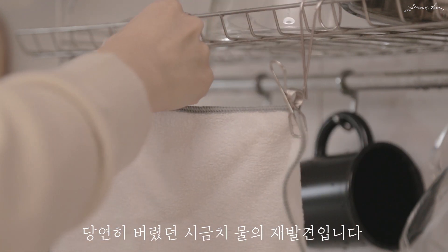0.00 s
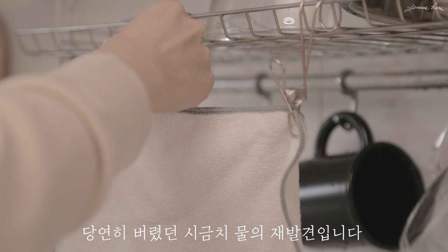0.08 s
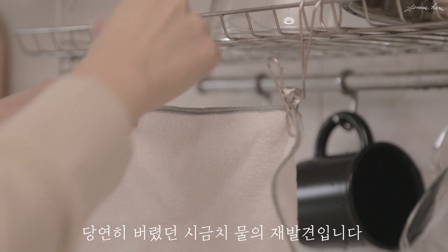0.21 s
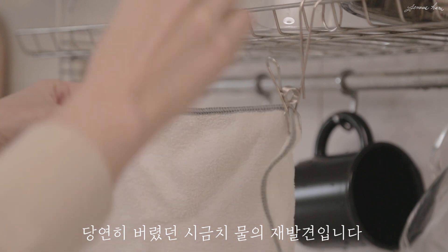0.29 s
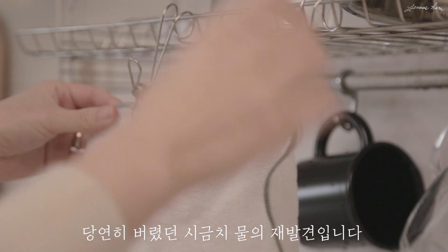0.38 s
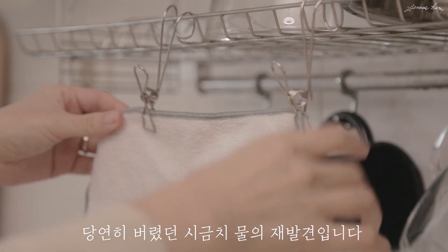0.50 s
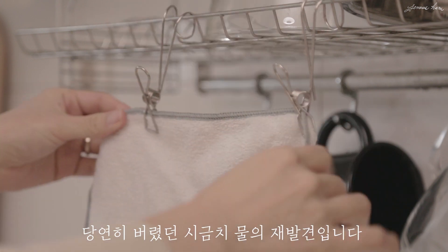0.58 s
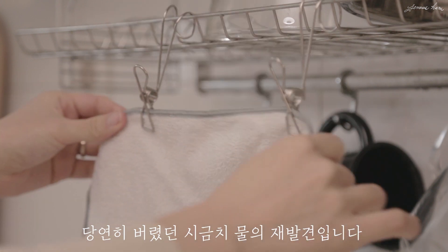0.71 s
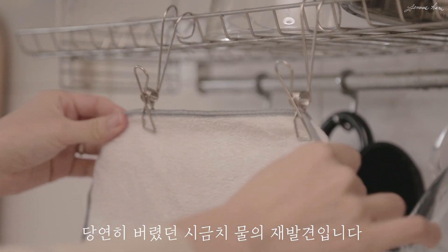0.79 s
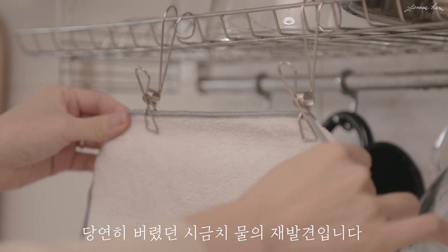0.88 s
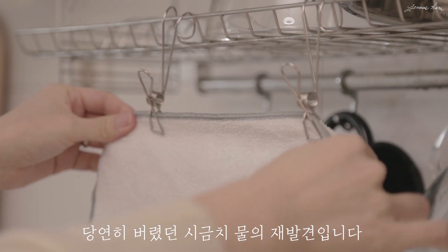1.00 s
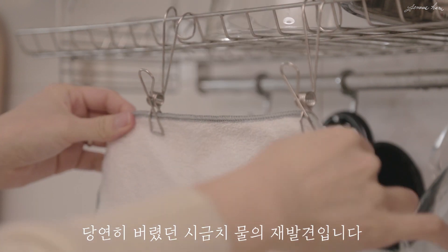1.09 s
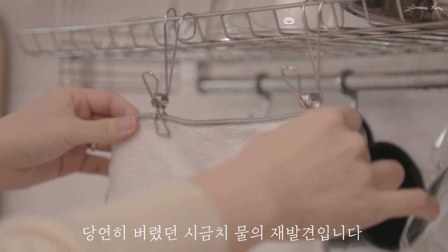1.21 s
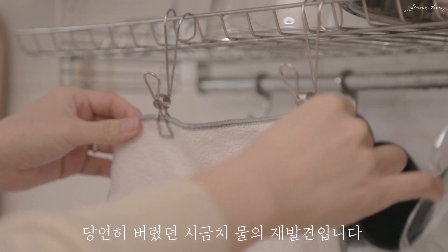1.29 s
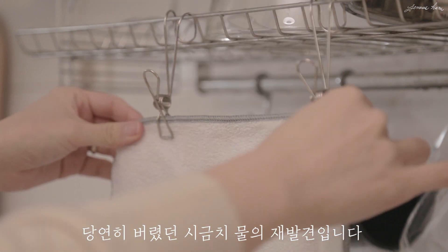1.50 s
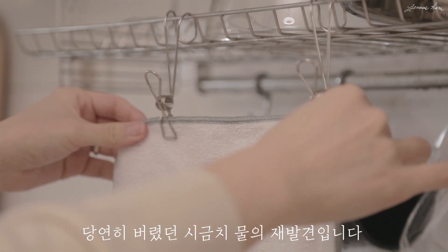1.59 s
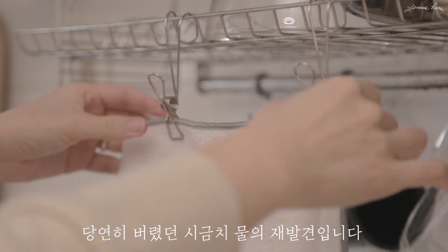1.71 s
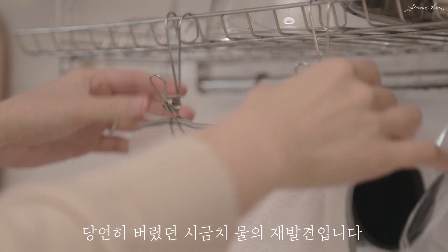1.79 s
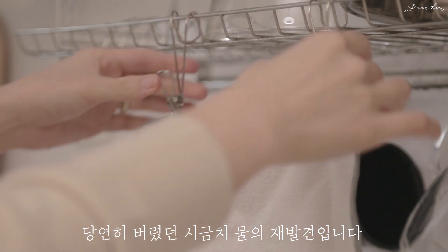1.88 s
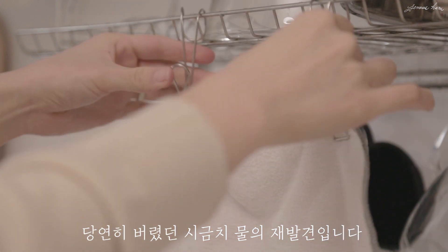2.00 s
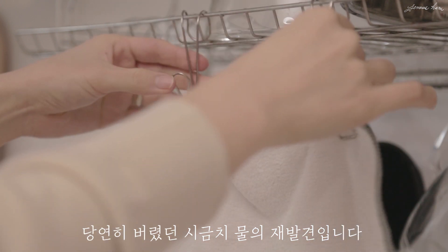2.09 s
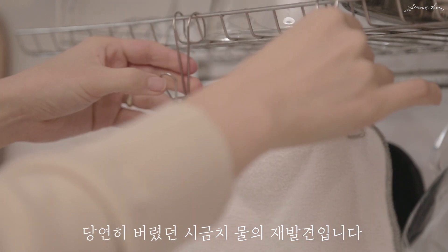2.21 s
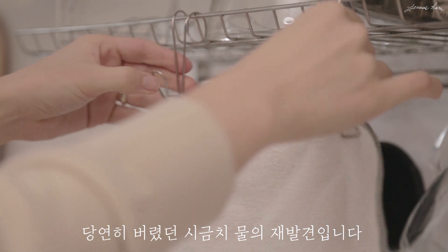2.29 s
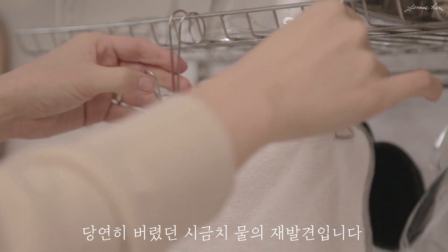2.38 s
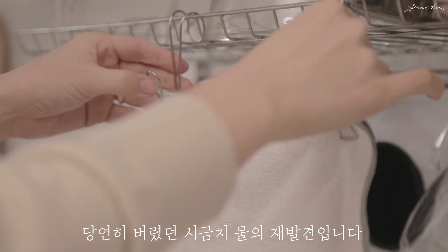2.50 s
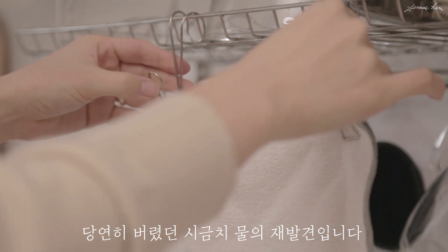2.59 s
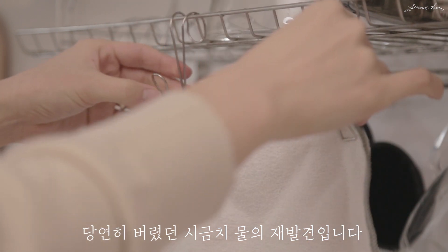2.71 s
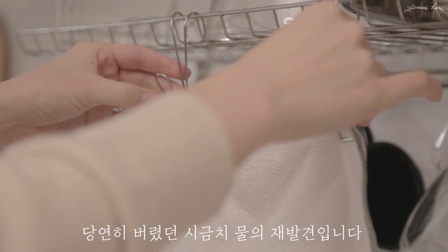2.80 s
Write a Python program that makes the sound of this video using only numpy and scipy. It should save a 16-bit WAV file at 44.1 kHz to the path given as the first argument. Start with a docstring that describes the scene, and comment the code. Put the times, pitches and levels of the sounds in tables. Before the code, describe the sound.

Steel wire clothespin hooks rattle on a wire dish rack, close by. Light contacts lead to the loudest bright clatter at 0.26-0.31 s. Sparse, mostly soft ticks follow, with slightly firmer ones near 0.7 and 1.5 s. From 2.0 to 2.55 s jangling clinks crowd together, with a faint low ring around 2.35 s, then fade. Small hard-walled kitchen, short reverberation, low hiss and very faint hum.

```python
"""Steel wire clothespin hooks knock on a wire dish rack close by in a small kitchen.
A quick cluster of contacts opens, sparser and mostly softer ones follow, and from about 2 s they crowd again.
Each contact is a dense rattle of loose wires that rings hook and rack; the hard walls answer it.
Near 2.3 s a faint low ring swells and fades, made of noise through one narrow resonance.
Shaped noise for room tone and microphone hiss and a sine for a faint mains hum run throughout."""
import sys
import numpy as np
from scipy import signal
from scipy.fft import rfft, irfft, next_fast_len
from scipy.io import wavfile

SR = 44100
rng = np.random.default_rng(int(sys.argv[2]) if len(sys.argv) > 2 else 0)


def dump(signal):
    """Clip the signal to [-1, 1] and save it as 16-bit WAV at the path in sys.argv[1]."""
    limited = np.clip(np.atleast_2d(signal).T, -1, 1)
    pcm = np.round(limited * 32767).astype(np.int16)
    wavfile.write(sys.argv[1], SR, pcm)


N = 125685
RING = 32768  # transform length of a contact in samples; its first half is heard

# Stereo image of the rack itself: pitch_hz, left_right_likeness (0-1)
RACK_LIKENESS = [(100, 0.6), (1000, 0.81), (3000, 1), (6000, 0.44), (12000, 0.3)]


def amp(db):
    """dB to gain."""
    return 10 ** (np.asarray(db) / 20)


def unit(x):
    """x at rms 1."""
    return x / np.sqrt(np.mean(x ** 2) + 1e-20)


def along(points, hz):
    """Reads a curve of (Hz, value) points on a log frequency axis."""
    f, v = np.transpose(points)
    return np.interp(np.log(hz + 1), np.log(f + 1), v)


def filtered(x, response):
    """x times a response of frequency."""
    m = next_fast_len(x.shape[-1] + 8192)
    spectrum = rfft(x, m) * response(np.fft.rfftfreq(m, 1 / SR))
    return irfft(spectrum, m)[..., :x.shape[-1]]


def paired(x, likeness):
    """Turns two unrelated signals into a left and a right as alike as asked at each frequency."""
    def mid_and_side_gains(hz):
        angle = np.arccos(np.clip(along(likeness, hz), -1, 1)) / 2
        return np.array([np.cos(angle), np.sin(angle)])

    mid, side = filtered(x, mid_and_side_gains)
    return np.array([mid + side, mid - side])


def dying(x, t60):
    """Every frequency of x dies at its own speed; the first channel ends up at energy 1."""
    hz, t, z = signal.stft(x, SR, nperseg=256)
    decay = amp(-60 * t / t60(hz)[:, None])
    tail = signal.istft(z * decay, SR, nperseg=256)[1][:, :x.shape[1]]
    return tail / np.linalg.norm(tail[0])


def rattle(rise_s, t60_s):
    """Loose wires tick densely against each other on two sides of the rack: they swell, then die."""
    # Decay along the spectrum: pitch_hz, share_of_t60
    decay_shares = [(200, 1.07), (700, 1.285), (2500, 0.84), (7000, 0.91), (13000, 0.78)]
    tick_share, scatter_db = 0.34, 2.5  # share of samples that hold a tick, spread of their levels
    size, t = (2, RING // 2), np.arange(RING // 2) / SR
    ticks = (rng.random(size) < tick_share) * rng.standard_normal(size)
    ticks = ticks * amp(scatter_db * rng.standard_normal(size))
    tail = dying(ticks, lambda hz: max(t60_s, .03) * along(decay_shares, hz))
    return tail * (1 - np.exp(-t / max(rise_s, .0003)))


def resonances(modes, hz):
    """Summed power response of resonances, each given as (Hz, width Hz, dB)."""
    steepness = 1.66  # above 1: darker valleys between resonances
    power = 0
    for mode_hz, width_hz, db in modes:
        damping = (hz * width_hz) ** 2
        peak = damping / ((mode_hz * mode_hz - hz * hz) ** 2 + damping)
        power = power + amp(db) ** 2 * peak ** steepness
    return power


def causal(power):
    """The minimum-phase response that has this power: the metal rings only after it is touched."""
    cepstrum = irfft(np.log(power + 1e-12) / 2, RING)
    # fold the backward half onto the forward half
    fold = np.r_[1, 2 * np.ones(RING // 2 - 1), 1, np.zeros(RING // 2 - 1)]
    return np.exp(rfft(cepstrum * fold))


def kitchen_walls(near):
    """Hard walls return the rattle as a diffuse tail whose frequencies die at their own speeds."""
    # Reverberation of the room: pitch_hz, t60_s
    wall_t60 = [(150, 0.36), (1000, 0.35), (3000, 0.29), (8000, .28), (14000, 0.14)]
    # Stereo image of the walls' answer: pitch_hz, left_right_likeness
    wall_likeness = [(100, 0.26), (1000, 0.38), (3000, 0.48), (6000, 0.055), (12000, 0.073)]
    first_wall_s = .004
    tail = dying(rng.standard_normal(near.shape), lambda hz: along(wall_t60, hz))
    tail = paired(tail, wall_likeness)
    late = np.pad(near[0], (round(first_wall_s * SR), 0))
    return signal.fftconvolve(late[None], tail, axes=1)[:, :RING // 2]


def by_parts(x, levels_db):
    """Splits a contact into six bands and sets each one's level over the first 20 ms."""
    # Borders between thud, frame, long, middle and short wires, hook tips: edge_hz
    part_edges = [400, 1000, 2150, 3400, 6800]
    hz = np.fft.rfftfreq(RING, 1 / SR)
    above = [1 / (1 + (edge_hz / (hz + 1)) ** 8) for edge_hz in part_edges]
    shares = -np.diff([1 + 0 * hz, *above, 0 * hz], axis=0)
    parts = irfft(rfft(x, RING)[None] * shares[:, None], RING)
    middle = parts[:, :, :SR // 50].mean(1)  # mean of both microphones
    early = np.sqrt(np.mean(middle ** 2, axis=1))
    return np.tensordot(amp(levels_db) / early, parts, 1)


def contacts():
    """Each contact rings hook and rack, reaches both microphones and comes back from the walls."""
    # Contacts of hook and rack: start_s, jangle_amount_db (how much loose-wire jangle),
    # level_db of each of the six parts (6 columns), low_hz, mid_hz, high_hz (rings of the touched place),
    # rise_s, hook_share (0-1), t60_s
    touches = [(0.001, 13, -68, -49, -48.5, -51.5, -54.5, -59.5, 550, 2890, 4170, 0.001, 0.2, 0.33),
               (0.069, -23, -70, -45, -68, -64, -71.5, -81, 584, 1390, 3850, 0.0035, 0.2, 0.13),
               (0.094, -18, -78, -66, -66, -65, -73, -69, 570, 1300, 3920, 0.0019, 0.49, 0.12),
               (0.117, -37.5, -78.5, -64.5, -68, -67, -93, -80, 458, 1160, 4150, 0.0033, 0.6, 0.6),
               (0.196, -16, -59.5, -57, -50.5, -49, -45, -51.5, 840, 3280, 3770, 0.004, 0.6, 0.6),
               (0.233, -17, -53, -54, -49.5, -45.5, -46.5, -53, 603, 3280, 4370, 0.0023, 0.21, 0.2),
               (0.261, -23, -82, -30.5, -39, -30.5, -37.5, -33, 590, 3020, 9400, 0.009, 0.2, 0.1),
               (0.273, -6, -47.5, -47.5, -32, -32.5, -28.5, -30.5, 594, 2780, 4860, 0.0038, 0.85, 0.099),
               (0.308, 15, -45.5, -40, -37.5, -46, -39.5, -44, 616, 1780, 5130, 0.001, 0.2, 0.27),
               (0.459, -42, -83, -55.5, -61, -73, -73, -85, 685, 2130, 4230, 0.0016, 1, 0.28),
               (0.586, -33, -72.5, -62, -74, -93, -79, -84, 700, 1070, 4360, 0.0012, 0.51, 0.19),
               (0.713, -28, -57, -45, -40, -45.5, -42.5, -42.5, 683, 1674, 9400, 0.0068, 1, 0.24),
               (0.799, -15, -67, -57.5, -47.5, -50, -57.5, -63.5, 600, 1510, 3930, 0.0051, 0.41, 0.36),
               (0.916, -41, -80, -54, -50, -55, -59, -56, 577, 2586, 4400, 0.0014, 0.9, 0.28),
               (0.925, -48, -65.5, -51, -54, -48, -54, -51.5, 703, 2660, 7240, 0.001, 0.49, 0.22),
               (1.263, -42, -70, -61, -54.5, -64, -61.5, -73, 714, 1607, 4000, 0.002, 0.91, 0.24),
               (1.301, -51, -72, -60.5, -57.5, -60.5, -60, -71, 622, 1670, 4060, 0.0024, 0.69, 0.19),
               (1.353, -47, -82, -76, -56.5, -65, -84, -79, 664, 1630, 4100, 0.0018, 0.6, 0.27),
               (1.387, -28, -90, -61, -41, -56, -72, -70, 700, 1796, 3900, 0.0012, 0.76, 0.23),
               (1.422, -35, -73, -49, -46, -53.5, -50.5, -54, 664, 1650, 6320, 0.0024, 0.34, 0.17),
               (1.431, -43, -85, -66, -59, -58, -55, -56, 710, 1620, 6240, 0.0025, 0.6, 0.25),
               (1.471, -32, -62, -71, -50, -61, -57, -62, 584, 2340, 5360, 0.0018, 0.97, 0.6),
               (1.528, -19, -69, -56.5, -44.5, -43.5, -48, -40, 725, 2620, 9900, 0.006, 0.68, 0.17),
               (1.763, -54, -72, -66, -74, -72, -90, -79, 620, 1380, 7000, 0.0023, 0.44, 0.16),
               (1.809, -42, -71, -68, -93, -96, -95, -87, 590, 1110, 8470, 0.003, 0.25, 0.1),
               (1.949, -24, -80, -56, -45, -42, -41.5, -49.5, 600, 1474, 3740, 0.0015, 0.86, 0.57),
               (2.011, -24, -81, -42.5, -46, -52, -50.5, -47.5, 684, 1560, 6510, 0.0026, 1, 0.12),
               (2.026, -10, -55.5, -35, -35.5, -37, -35.5, -33, 690, 2650, 9600, 0.0026, 0.41, 0.27),
               (2.064, -5, -47.5, -37, -33.5, -35, -33, -36.5, 583, 2240, 4000, 0.0013, 0.7, 0.31),
               (2.154, -7, -55.5, -44.5, -45, -51, -47, -51.5, 610, 1860, 3900, 0.0025, 0.22, 0.068),
               (2.173, 4, -51, -51, -39.5, -39, -38.5, -35, 689, 2840, 7440, 0.0025, 0.98, 0.22),
               (2.235, 0, -55, -51, -44, -46.5, -40, -41.5, 785, 2150, 6800, 0.0014, 0.97, 0.42),
               (2.29, -10, -45.5, -38, -45, -36.5, -42.5, -42.5, 610, 2750, 6650, 0.0035, 0.6, 0.17),
               (2.354, -7, -61, -57, -60, -57, -62, -67, 579, 2150, 3300, 0.0023, 0.82, 0.6),
               (2.448, -22, -43, -41, -41.5, -41.5, -39, -47, 507, 2880, 5730, 0.0025, 0.62, 0.29),
               (2.538, -6, -46.5, -38.5, -39, -41.5, -36, -33.5, 634, 1590, 6700, 0.002, 0.92, 0.16),
               (2.619, -42, -71, -51, -57, -69, -59, -58, 619, 2050, 6700, 0.0023, 0.25, 0.15),
               (2.654, -20, -76, -61.5, -51, -53.5, -68, -66, 732, 2326, 3740, 0.0023, 0.27, 0.13)]
    # Resonances of the rack: pitch_hz, width_hz, level_db
    rack_modes = [(126, 65, -8.5), (257.8, 14.5, 1), (466, 60, -9.5), (520, 45, -9), (601, 29, 3.5),
                  (700, 21, -19), (1053, 20, -7.5), (1163, 39, -3), (1890, 98, 0.5), (2290, 75, -3.5),
                  (2830, 96, 2.5), (3650, 36, -22), (4310, 690, -9.5), (4940, 48, -8), (6180, 130, 6),
                  (6610, 94, -10), (7300, 59, -3), (9900, 1200, -22.5), (11900, 33, 6)]
    # Resonances of the hook: pitch_hz, width_hz, level_db
    hook_modes = [(493, 60, -6.5), (580, 43, -7.5), (733, 104, -2), (1315, 42, -10), (1510, 54, -7),
                  (1523, 45, -2), (1740, 83, -3), (2084, 88, 0.5), (2674, 140, -0.5), (2900, 91, -7),
                  (4080, 350, -6.5), (5600, 230, -9), (6610, 130, -3), (7400, 650, -4), (9510, 120, 1),
                  (10300, 590, -4), (11900, 360, -9)]
    # Low, middle and high ring of the touched place, one row each: width_hz, level_db
    touched_rings = [(60, 2), (140, 3.5), (260, -1)]
    # Spectrum of the loose wires' broad jangle: pitch_hz, level_db (per Hz)
    jangle_curve = [(53, -76.5), (90, -40), (253, -7.5), (389, -14.5), (599, 5.5), (846, -7), (1140, -4),
                    (2890, -2), (4740, -6.5), (10100, -3.5), (15500, -14.5)]
    # jangle gain at a reference amount, that amount, and slope in dB per dB
    jangle_db, reference_db, jangle_slope = -4.5, -17.5, 0.27
    walls_db = -6.5
    lead_s = .002  # a rattle starts before its front is heard
    lag_s = 3.2e-5  # direct sound reaches the left microphone this much later
    low_cut_hz, dull_hz = 119, 13300  # low cut and treble roll-off of the contacts

    hz = np.fft.rfftfreq(RING, 1 / SR)
    hook, rack = resonances(hook_modes, hz), resonances(rack_modes, hz)
    jangle = amp(along(jangle_curve, hz))
    lag = np.exp(1j * np.pi * hz * lag_s * np.array([[-1], [1]]))
    out = np.zeros((2, N + RING))
    for start_s, jangle_amount_db, *levels_db, low_hz, mid_hz, high_hz, rise_s, share, t60_s in touches:
        share = np.clip(share, 0, 1)
        place = [(ring_hz, *ring) for ring_hz, ring in zip((low_hz, mid_hz, high_hz), touched_rings)]
        body = share * hook + (1 - share) * rack + resonances(place, hz)
        jangle_gain = amp(jangle_db + jangle_slope * (jangle_amount_db - reference_db))
        body = causal(body + (jangle_gain * jangle) ** 2)
        near = irfft(rfft(rattle(rise_s, t60_s), RING) * body, RING)[:, :RING // 2]
        wet = kitchen_walls(near)
        direct = irfft(rfft(paired(near, RACK_LIKENESS), RING) * lag, RING)[:, :RING // 2]
        sound = by_parts(direct + amp(walls_db) * wet, levels_db)[:, :RING // 2]
        first = max(round((start_s - lead_s) * SR), 0)
        out[:, first:first + RING // 2] += sound

    def tone(f):
        low_cut = (1j * f / (low_cut_hz + 1j * f)) ** 3
        return low_cut / np.sqrt(1 + (f / dull_hz) ** 12)

    return filtered(out[:, :N], tone)


def quiet():
    """Room tone and microphone hiss are shaped noise; the faint mains hum is one sine."""
    # Spectrum of room tone and hiss: pitch_hz, level_db (per Hz, relative)
    hiss_curve = [(15, -36), (25, -3), (140, -1), (199, -2), (275, -5), (350, -2), (922, -6.5), (1060, -15),
                  (1180, -2), (1310, -11.5), (2430, -9), (3840, -13), (15600, -16)]
    # Stereo image of room tone and hiss: pitch_hz, left_right_likeness
    hiss_likeness = [(60, 0), (180, 0.023), (550, 0.84), (1650, 0.3), (4970, 0), (15000, 0.0)]
    hiss_db, hum_hz, hum_db = -64.0, 60.5, -83.5  # levels are rms
    noise = paired(rng.standard_normal((2, N)), hiss_likeness)
    hiss = unit(filtered(noise, lambda hz: amp(along(hiss_curve, hz))))
    hum = np.sqrt(2) * amp(hum_db) * np.sin(2 * np.pi * hum_hz * np.arange(N) / SR)
    return amp(hiss_db) * hiss + hum


def low_ring():
    """A low ring as the rack swings: noise through one narrow resonance, swelling and fading."""
    # The ring, a single row: start_s, length_s, pitch_hz, width_hz, level_db
    swing = (2.31, .16, 868, 24, -55)
    start_s, length_s, ring_hz, width_hz, db = swing
    progress = np.clip((np.arange(N) / SR - start_s) / length_s, 0, 1)
    swell = np.sqrt(np.abs(np.sin(np.pi * progress)))
    noise = paired(rng.standard_normal((2, N)), RACK_LIKENESS)
    tone = filtered(noise, lambda hz: resonances([(ring_hz, width_hz, 0)], hz))
    return amp(db) * unit(tone) * swell


def scene():
    """Everything that reaches the two microphones."""
    return contacts() + low_ring() + quiet()


def record(dry):
    """The right microphone is a little louder; nothing passes above the band limit."""
    right_db, top_hz = 1.9, 15750  # right over left, band limit
    balance = amp([[-right_db / 2], [right_db / 2]])
    return filtered(dry * balance, lambda hz: hz < top_hz)


dry = scene()
out = record(dry)
dump(out)
```